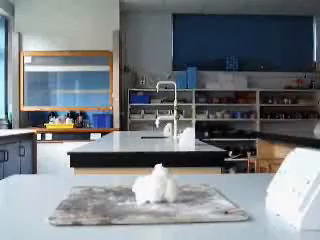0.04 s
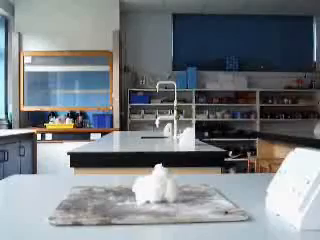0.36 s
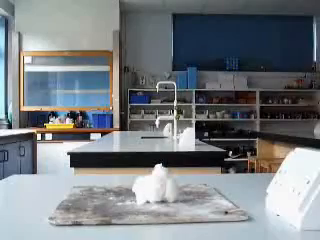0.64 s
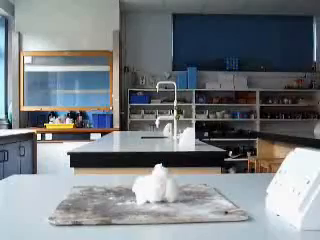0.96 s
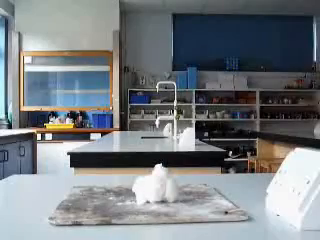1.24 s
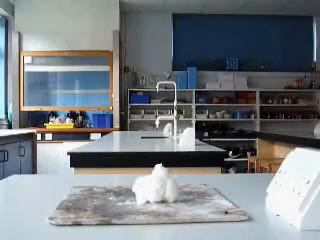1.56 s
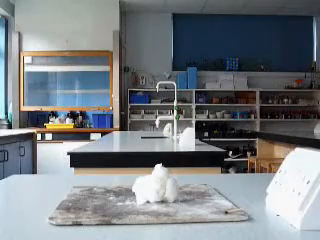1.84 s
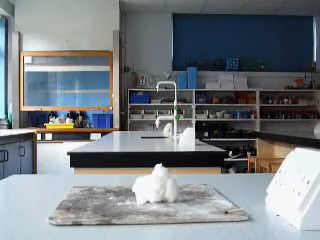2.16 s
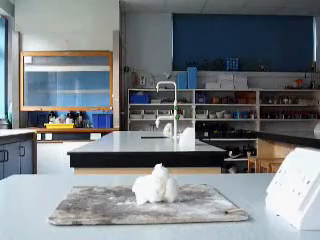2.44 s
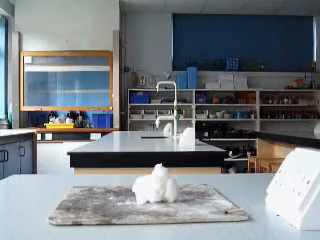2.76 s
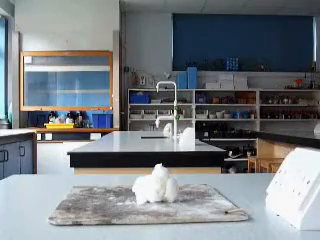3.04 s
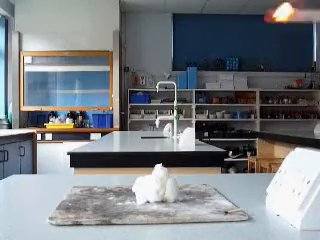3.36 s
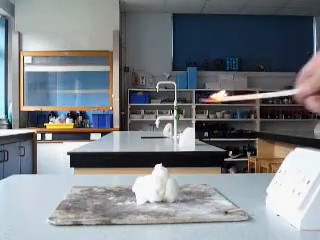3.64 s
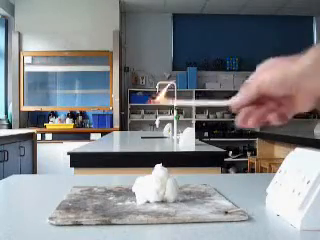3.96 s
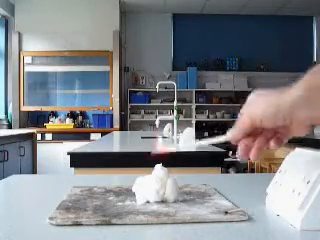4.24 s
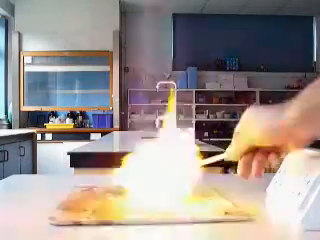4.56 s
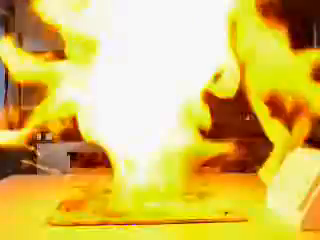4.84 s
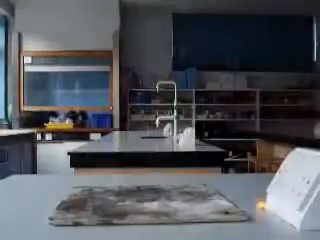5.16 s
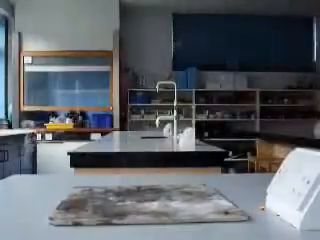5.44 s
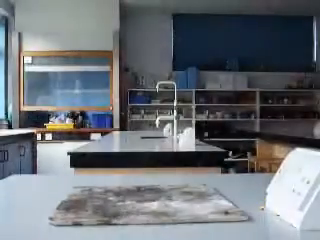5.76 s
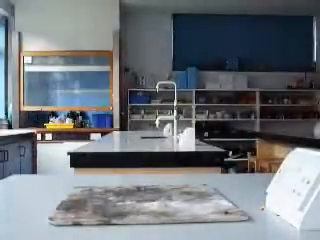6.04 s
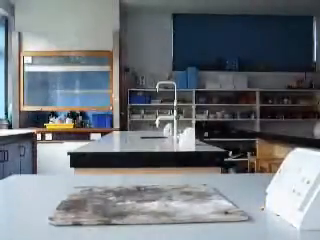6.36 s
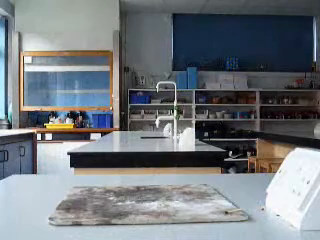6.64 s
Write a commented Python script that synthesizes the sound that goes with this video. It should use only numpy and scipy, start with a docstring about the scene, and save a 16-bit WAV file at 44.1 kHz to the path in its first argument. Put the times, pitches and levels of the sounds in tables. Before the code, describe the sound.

Soft steps and a steady hiss, then guncotton burns in a quick fizzing, popping whoosh, and a camera iris clicks.

```python
"""On a laboratory bench, a clump of guncotton is lit with a splint and flashes off in one low whoosh.
Its fibres fizz, the flame roars, pockets of gas pop, and the fireball swells with a low boom.
Soft steps come before and after it, over a low rumble of ventilation. A small camera stands close by:
its iris clicks after the glare, and its microphone cuts off the treble and adds a hiss and a whine."""
import sys
import numpy as np
from scipy import signal
from scipy.fft import rfft, irfft
from scipy.io import wavfile
from scipy.ndimage import uniform_filter1d

SR = 44100
rng = np.random.default_rng(int(sys.argv[2]) if len(sys.argv) > 2 else 0)


def int16_out(signal):
    """Quantize to a 16-bit WAV file."""
    q = np.round(np.clip(np.atleast_2d(signal).T, -1, 1) * 32767)
    wavfile.write(sys.argv[1], SR, q.astype(np.int16))


N = 304731
T = np.arange(N) / SR

# flares, as one tuft after another catches and the last scraps burn out:
# t/s, hold/s, roar level/dB, boom level/dB, fizz level/dB
FLARES = [(4.597, .02, -35, -44, -37), (4.660, .022, -17.5, -17, -23.5), (4.734, .008, -24.5, -18.5, -26),
          (4.785, .03, -27, -30, -38), (4.874, .003, -40, -48, -39), (4.915, .09, -36.5, -39.5, -46)]
FLARE_S, HOLD_S, ROAR_DB, BOOM_DB, FIZZ_DB = np.transpose(FLARES)


def gain(db):
    """Turn decibels into a number to multiply by."""
    return 10 ** (np.asarray(db) / 20)


def unit(x):
    """Scale a sound to an average (rms) level of 1."""
    return x / np.sqrt(np.mean(x ** 2))


def steady(x, span_s):
    """Even out the level to 1 over a short span, keeping the finer grain."""
    return x / np.sqrt(uniform_filter1d(x ** 2, int(span_s * SR)) + 1e-12)


def colour(x, points):
    """Shape the tone along a curve of (f/Hz, level/dB) points that falls away beyond its ends."""
    hz, db = np.transpose(points)
    f = np.maximum(np.fft.rfftfreq(N, 1 / SR), 1)
    curve = gain(np.interp(np.log(f), np.log(hz), db))
    roll_off = np.minimum(f / hz[0], 1) ** 2 * np.minimum(hz[-1] / f, 1) ** 4
    return irfft(rfft(x) * curve * roll_off, N)


def band(x, low_hz, high_hz):
    """Keep the part of a sound between two frequencies."""
    return signal.sosfilt(signal.butter(4, [low_hz, high_hz], "bandpass", fs=SR, output="sos"), x)


def die_away(t, fade_s):
    """A fade that drops by 60 dB in fade_s seconds."""
    return np.exp(-np.log(1000) * t / fade_s)


def crackle(per_s, spread_db):
    """Tiny random bursts of very unequal size."""
    bursts = (rng.random(N) < per_s / SR) * rng.standard_normal(N)
    return bursts * gain(spread_db * rng.exponential(size=N))


def add(out, s, sound):
    """Mix a sound in, starting at s seconds."""
    i = int(s * SR)
    out[i:i + len(sound)] += sound[:N - i]


def ventilation():
    """Moving air makes a low, steady rumble."""
    # tone of the rumble: f/Hz, level/dB
    rumble_tone = [(30, -13.5), (70, -15.5), (115, -2), (200, 1), (320, -4), (500, -11), (1300, -15),
                   (3000, -24.5)]
    return gain(-50) * unit(colour(rng.standard_normal(N), rumble_tone))


def steps():
    """Each step is a dull thud of the floor with a short echo from the room."""
    # soft steps and knocks: t/s, level/dB, brightness/Hz
    footfalls = [(0.896, -33.5, 265), (1.519, -35, 280), (2.17, -37, 251), (3.303, -39, 716),
                 (3.332, -40, 450), (6.479, -36, 550), (6.498, -41, 550)]
    out = np.zeros(N)
    t = np.arange(SR // 2) / SR
    rise = 1 - np.exp(-t / 0.0009)
    fall = np.exp(-t / 0.009) + gain(-18) * np.exp(-t / .08)  # thud, then echo
    for s, db, bright_hz in footfalls:
        thud = band(rng.standard_normal(len(t)), 0.42 * bright_hz, 1.04 * bright_hz)
        add(out, s, gain(db) * steady(thud, span_s=0.017) * rise * fall)
    return out


def iris_clicks():
    """The iris blades snap from stop to stop; each hit rings the lens housing and chatters briefly."""
    # stops of the iris, closing after the glare and opening again: t/s, level/dB
    blade_stops = [(5.001, -18.5), (5.0155, -22), (5.2985, -23.5), (5.3141, -23), (5.333, -25),
                   (5.348, -23.5), (5.398, -21), (5.4165, -23.5)]
    # ringing tones of the housing: f/Hz, level/dB, time to fade by 60 dB/s
    housing_tones = [(565, -11.5, 0.081), (930, -14, 0.058), (1120, -1, 0.023), (1260, 3.5, 0.014),
                     (1720, -5, 0.028), (2180, -19, 0.083), (2650, -15, .02), (3630, -15.5, 0.03)]
    out = np.zeros(N)
    t = np.arange(SR // 10) / SR
    rise = 1 - np.exp(-t / 0.00039)
    for s, click_db in blade_stops:
        for delay_s, drop_db in ((0, 0), (.0065, -10)):  # the hit and one bounce
            ringing = np.zeros(len(t))
            for hz, db, fade_s in housing_tones:
                db += 2.6 * rng.standard_normal()  # no two hits sound alike
                hz *= 1 + 0.027 * rng.standard_normal()
                ringing += gain(db) * np.sin(2 * np.pi * hz * t) * die_away(t, fade_s)
            chatter = unit(band(rng.standard_normal(len(t)), 840, 2600)) * np.exp(-t / 0.009)
            click = rise * (0.64 * ringing + gain(-11) * chatter)
            add(out, s + delay_s, gain(click_db + drop_db) * click)
    return band(out, 560, 4300)  # so small a body gives no bass


def flaring(peaks_db, lag_s, rise_s, fall_s, echo_db, echo_s):
    """Loudness of the fire over time: each flare grows, holds, dies quickly and leaves an echo."""
    ignition_s, catch_s = 4.585, .012  # the splint touches; the fibres take this long to catch
    power = np.zeros(N)
    for s, hold_s, db in zip(FLARE_S, HOLD_S, peaks_db):
        age = T - s - lag_s
        after_hold = np.maximum(age - hold_s, 0)
        rise = np.exp(np.minimum(age, 0) / rise_s)
        echo = gain(echo_db) * die_away(after_hold, echo_s)
        fall = np.maximum(np.exp(-after_hold / fall_s), echo)
        power += (gain(db) * rise * fall) ** 2
    lit = np.clip((T - ignition_s) / catch_s, 0, 1)
    return np.sqrt(power) * lit


def fibre_fizz():
    """Fibres flash in a dense crackle, just ahead of the roar."""
    # tone of the fizz: f/Hz, level/dB
    fizz_tone = [(850, -23), (1150, -9), (1340, 5.5), (1500, -4), (1680, -1.5), (1950, -6), (2400, -4),
                 (2850, -7.5), (3500, -17.5), (4200, -23)]
    fizz = steady(colour(crackle(per_s=6000, spread_db=1.2), fizz_tone), span_s=0.015)
    return fizz * flaring(FIZZ_DB, lag_s=-.003, rise_s=.017, fall_s=.018, echo_db=-13, echo_s=1.12)


def gas_pops():
    """Each pocket of gas goes off at once, sending out one push and one pull of pressure."""
    # pops: t/s, peak level/dB, time from the middle of the pop to its peak/ms
    gas_pockets = [(4.654, -13.5, 0.33), (4.664, -9.5, 0.33), (4.673, -7.5, 0.37), (4.684, -7, 0.28),
                   (4.691, -9, 0.33), (4.736, -16, 0.15), (4.767, -16, .84), (4.995, -22, .5),
                   (5.000, -13.5, 0.16), (5.014, -24, .7)]
    out = np.zeros(N)
    t = np.arange(-256, 256) / SR
    for s, db, ms in gas_pockets:
        scaled_time = t * 1000 / ms
        add(out, s + t[0], gain(db) * scaled_time * np.exp((1 - scaled_time ** 2) / 2))
    return out


def flame_roar():
    """The swirling gas of the flame roars with each flare."""
    # tone of the roar: f/Hz, level/dB
    roar_tone = [(280, -27), (410, -2), (480, -4), (590, 0), (750, 4), (920, -3.5), (1040, 3), (1200, -6),
                 (1600, -28)]
    roar = steady(colour(crackle(per_s=4000, spread_db=1.6), roar_tone), span_s=0.019)
    return roar * flaring(ROAR_DB, lag_s=.004, rise_s=.012, fall_s=.007, echo_db=-13, echo_s=1.2)


def fireball_boom():
    """The fireball swells last with a low boom."""
    # low tones that colour the boom: f/Hz, width/Hz, level/dB
    boom_tones = [(126, 18, -3.5), (163, 23, -3.5), (195.6, 14, -0.5), (245, 28, 3), (315, 8.1, 7.5),
                  (356, 11, -1)]
    noise = rng.standard_normal(N)
    coloured = np.zeros(N)
    for hz, width_hz, db in boom_tones:
        coloured += gain(db) * signal.lfilter(*signal.iirpeak(hz, hz / width_hz, fs=SR), noise)
    boom = steady(band(coloured, 72, 363), span_s=0.0306)
    return boom * flaring(BOOM_DB, lag_s=.013, rise_s=.012, fall_s=.034, echo_db=-18, echo_s=1.1)


def scene():
    """Everything that reaches the microphone, in one channel."""
    guncotton = flame_roar() + fibre_fizz() + fireball_boom() + gas_pops()
    return (guncotton + iris_clicks() + steps() + ventilation())[None]


def record(dry):
    """The microphone cuts the treble, hisses and whines; its steady offset clicks as it switches on."""
    # tone of the hiss: f/Hz, level/dB
    hiss_tone = [(60, -28), (300, 2.5), (1300, 1), (2200, 0), (3500, 0), (4100, -9), (4550, -6), (6300, -8),
                 (8200, -13), (10300, -11.5), (11500, -19.5), (14500, -19.5)]
    # tones of the electronic whine: f/Hz, rms level/dB
    whine_tones = [(2665, -66), (5335, -73), (8000, -62.5), (10664, -80)]
    mic_top_hz, output_top_hz = 3900, 14700
    switch_on_s, offset = 0.2005, -.0645
    muffled = signal.sosfilt(signal.ellip(6, .3, 60, mic_top_hz, fs=SR, output="sos"), dry)
    hiss = gain(-47.5) * unit(colour(rng.standard_normal(N), hiss_tone))
    whine = sum(np.sqrt(2) * gain(db) * np.sin(2 * np.pi * hz * T) for hz, db in whine_tones)
    live = (muffled + hiss + whine + offset) * (T >= switch_on_s)
    return signal.sosfilt(signal.ellip(10, .1, 80, output_top_hz, fs=SR, output="sos"), live)


dry = scene()
out = record(dry)
int16_out(out)
```